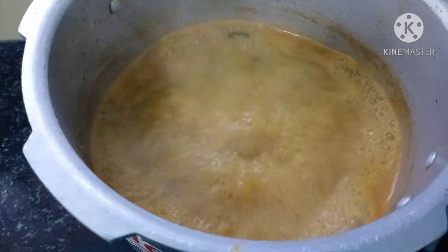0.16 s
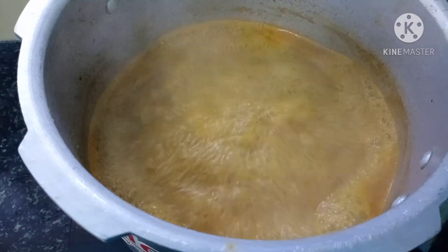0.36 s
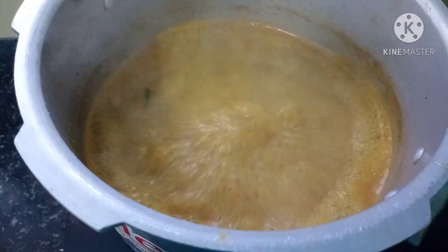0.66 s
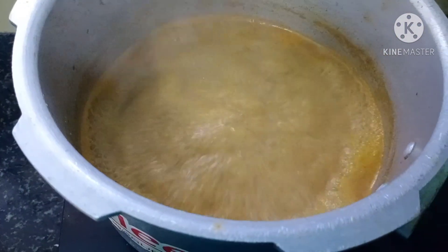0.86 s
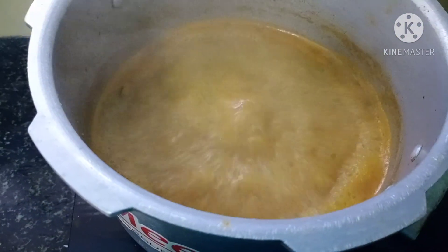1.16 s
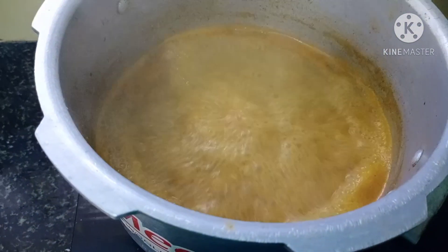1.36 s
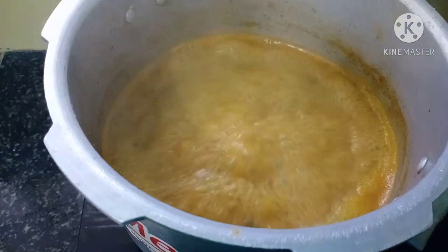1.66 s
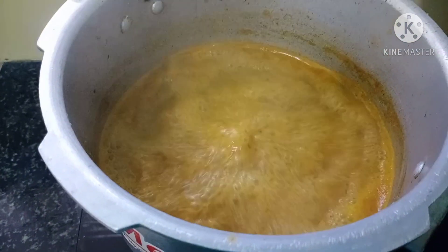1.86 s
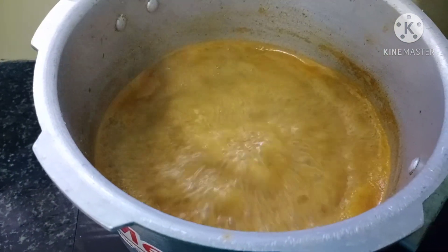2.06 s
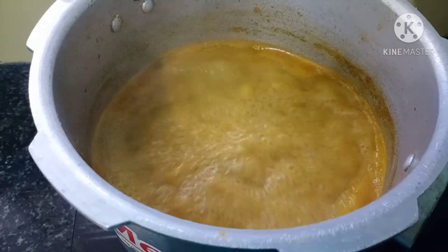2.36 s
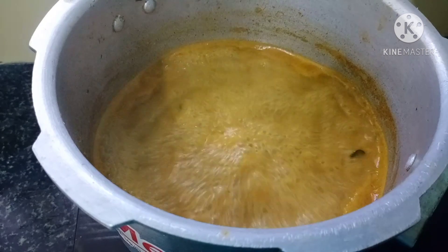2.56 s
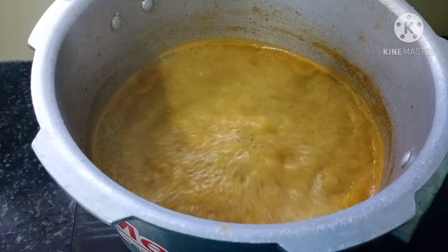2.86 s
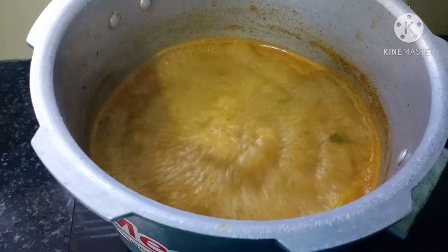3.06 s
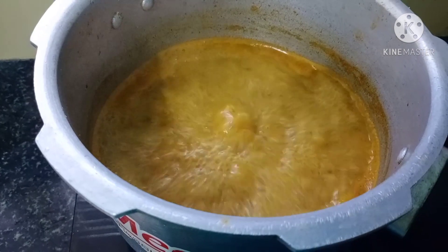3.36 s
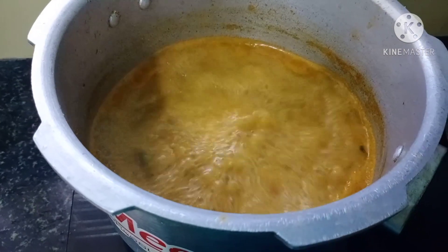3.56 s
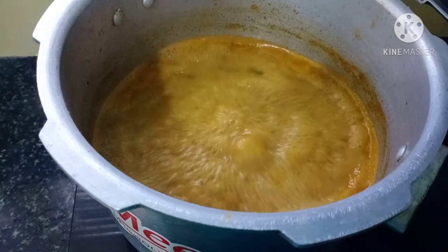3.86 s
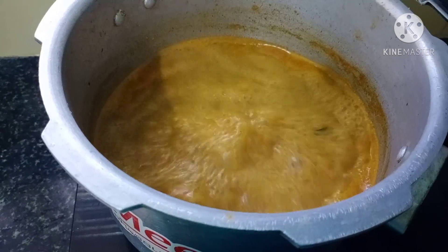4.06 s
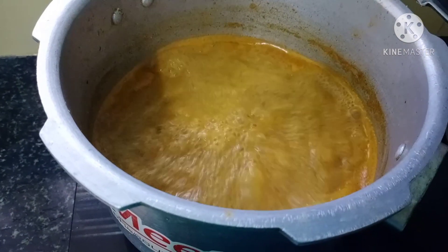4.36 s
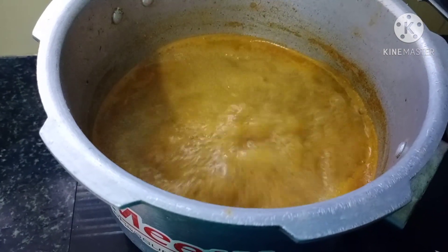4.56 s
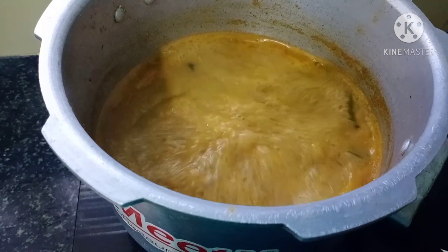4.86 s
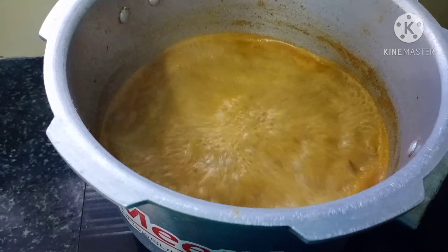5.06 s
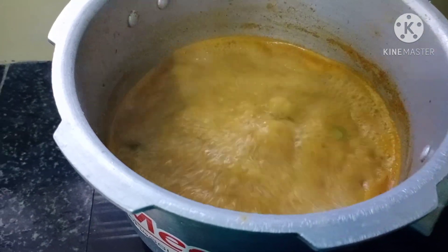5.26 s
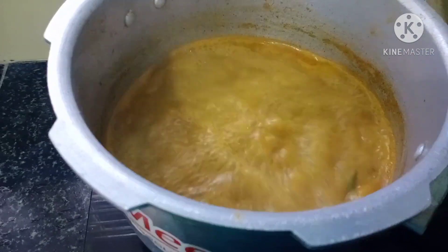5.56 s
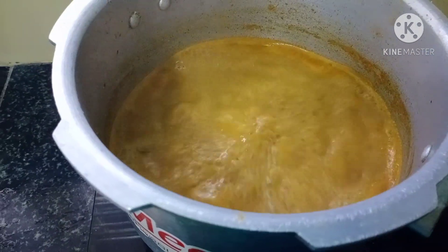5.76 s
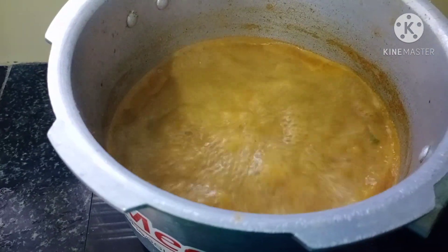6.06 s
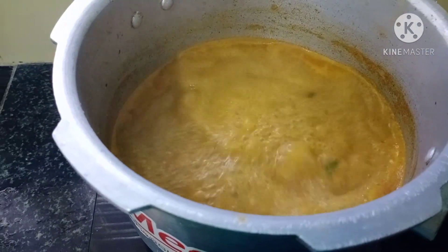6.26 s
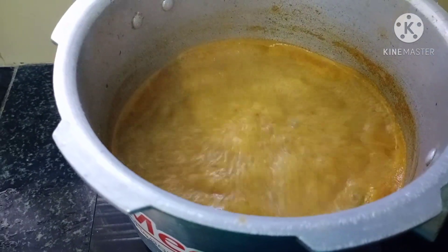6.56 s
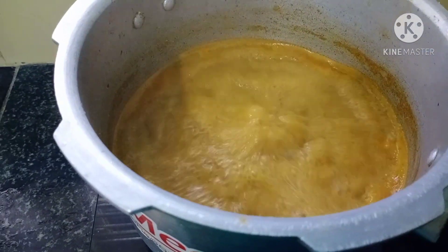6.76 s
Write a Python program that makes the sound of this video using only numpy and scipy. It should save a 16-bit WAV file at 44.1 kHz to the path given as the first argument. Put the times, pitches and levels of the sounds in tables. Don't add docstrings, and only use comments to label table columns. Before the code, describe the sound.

Close above a deep metal pot, thick curry boils hard without pause. Rapid bubble collapses ring the wall in a hollow, fluttering rattle that surges and eases, while big bubbles thump, glug and plop underneath. Fine fizz and tiny spits sit on top. A faint fan tone holds behind, and distant steel dishes ring softly near the end. A phone microphone in a home kitchen, dry and near.

```python
import sys
import numpy as np
from scipy import signal
from scipy.fft import rfft, irfft, next_fast_len
from scipy.io import wavfile
from scipy.ndimage import uniform_filter1d

SR = 44100
rng = np.random.default_rng(int(sys.argv[2]) if len(sys.argv) > 2 else 0)


def int16_out(signal):
    q = np.round(np.clip(np.atleast_2d(signal).T, -1, 1) * 32767)
    wavfile.write(sys.argv[1], SR, q.astype(np.int16))


def rack_gain(trim_db):
    fader = np.asarray(trim_db, float)
    return 10 ** (fader / 20)


N = 304092
LONG = next_fast_len(N)
HZ = np.maximum(np.arange(LONG // 2 + 1) * SR / LONG, 1)
SIMMER_DB, HEAVE_REST_DB = -41.5, -62.5

# centre_s [s], level_db [dB], length_s [s]
HEAVE_EVENTS = [(0.25, -55, 0.11), (0.64, -41, 0.064), (0.76, -46, 0.062), (1.12, -62, 0.05),
                (1.23, -60, 0.037), (1.57, -59, 0.057), (0.87, -46.5, 0.099), (1.18, -45, 0.073),
                (1.88, -62, 0.51), (1.97, -56, 0.066), (2.08, -43.5, 0.04), (2.19, -43.5, 0.042),
                (2.79, -53, 0.065), (2.9, -58, 0.2), (3.16, -50, 0.054), (3.49, -52, 0.071),
                (3.7, -45, 0.12), (5.64, -57.5, 0.5), (5.9, -65, 0.04), (5.99, -59, 0.049),
                (6.15, -59, 0.054), (6.4, -43.5, 0.099), (6.8, -49.5, 0.11)]


def in_time(rows):
    s, *columns = np.transpose(rows)
    return [np.interp(np.arange(N) / SR, s, c) for c in columns]


def at_hz(points, hz, axis=1):
    return np.interp(np.log(hz), np.log(np.array(points)[:, 0]), np.array(points)[:, axis])


def rms_one(x):
    return x / np.sqrt(np.mean(x ** 2) + 1e-20)


def within(x, low_hz, high_hz):
    sos = signal.butter(4, [low_hz, high_hz], "band", fs=SR, output="sos")
    band = signal.sosfilt(sos, x)
    return x / np.sqrt(np.mean(band ** 2))


def drift(rate_hz):
    r = np.exp(-80 * np.pi * rate_hz / SR)
    noise = rng.standard_normal(N // 40 + 2002)
    slow = signal.lfilter([1], [1, -2 * r, r * r], noise)[2000:]
    return np.interp(np.arange(N) / 40, np.arange(len(slow)), rms_one(slow))


def wobble(hz, stray_hz, rate_hz):
    phase = 2 * np.pi * np.cumsum(hz + stray_hz * drift(rate_hz)) / SR
    return np.sqrt(2) * np.sin(phase)


def grains(per_s, spread_db):
    sizes = rack_gain(spread_db * np.minimum(rng.exponential(1, N), 4.2))
    signs = rng.choice([-1, 1], N)
    return rms_one(sizes * signs * (rng.random(N) < per_s / SR))


def peak(x, hz, width_hz):
    r = np.exp(-np.pi * width_hz / SR)
    section = [(1 - r * r) / 2, 0, (r * r - 1) / 2, 1, -2 * r * np.cos(2 * np.pi * hz / SR), r * r]
    return signal.sosfilt([section, section], x + 1e-18)


def body(drive, modes, even_s):
    out = np.zeros(N)
    for k, (hz, width_hz, db) in enumerate(modes):
        out += (-1) ** k * rack_gain(db) * peak(drive, hz, width_hz)
    power = uniform_filter1d(out ** 2, size=int(even_s * SR))
    return rms_one(out / np.sqrt(power + 1e-12))


def coloured(drive, spectrum, patch_hz, patch_s, patchy_db):
    inside = (HZ > spectrum[0][0]) & (HZ < spectrum[-1][0])
    shaped = irfft(rfft(drive, LONG) * rack_gain(at_hz(spectrum, HZ)) * inside, LONG)
    cells = signal.stft(shaped, nperseg=1024)[2]
    field = rng.standard_normal(cells.shape)
    for axis, size in enumerate([patch_hz * 1024 / SR, patch_s * SR / 512]):
        for twice in range(2):
            field = uniform_filter1d(field, size=int(size) + 1, axis=axis)
    gain = rack_gain(patchy_db * np.minimum(rms_one(field), .4))
    return signal.istft(cells * gain, nperseg=1024)[1][:N]


def blips(events, rise_s, trim_db, order=2):
    out, t = np.zeros(N + SR), np.arange(int(6 * rise_s * SR)) / SR
    shape = ((t / rise_s) * np.exp(1 - t / rise_s)) ** order
    for s, db, hz in events:
        i = max(int((s - 0.403 * rise_s) * SR), 0)
        out[i:i + len(t)] += rack_gain(db + trim_db) * shape * np.sin(2 * np.pi * hz * t)
    return out[:N]


def swells(events, rest_db, restless_db, rate_hz):
    t = np.arange(0, N + 100, 100) / SR
    bells = sum(rack_gain(db) * np.exp(-(2 * (t - s) / length_s) ** 2) for s, db, length_s in events)
    rest = rack_gain(rest_db + restless_db * np.minimum(drift(rate_hz), .7))
    return 20 * np.log10(rest + np.interp(np.arange(N) / SR, t, bells))


def dips(events):
    t = np.arange(0, N + 100, 100) / SR
    bells = sum(db * np.exp(-(2 * (t - s) / length_s) ** 2) for s, db, length_s in events)
    return np.interp(np.arange(N) / SR, t, bells)


def lull(events, before_s, depth):
    marks = np.zeros(N)
    marks[[int(s * SR) for s, db, hz in events]] = 1
    size = int(before_s * SR)
    wide = uniform_filter1d(uniform_filter1d(marks, size=size), size=size)
    return 1 - np.clip(depth, 0, 1) * np.minimum(wide * before_s * SR * 1.35, 1)


def vigour():
    # centre_s [s], level_db [dB], length_s [s]
    surges = [(0.0, -38, 0.59), (0.46, -27.5, 0.26), (.12, -57, 0.17), (.85, -44, 0.21),
              (1.04, -36.5, 0.17), (1.68, -33, 0.28), (2.07, -31, 0.19), (2.53, -35, 0.28),
              (3.01, -34.5, 0.12), (3.16, -35, 0.13), (3.39, -26, 0.089), (3.56, -32.5, 0.23),
              (3.91, -55, 0.056), (4.12, -39.5, 0.65), (4.63, -39.5, 0.18), (5.13, -33.5, 0.37),
              (5.95, -39, 1), (6.26, -29, 0.2), (6.59, -44, 1), (6.81, -33, 0.13)]
    return swells(surges, SIMMER_DB, restless_db=6.0, rate_hz=0.54) - SIMMER_DB


def fan():
    # time_s [s], line_hz [Hz, 26th multiple of the turning rate], level_db [dB rms]
    line = [
        (0, 517.2, -54.5),
        (1, 517.6, -50),
        (2, 519, -55),
        (3.5, 519.8, -53.5),
        (5.4, 520.6, -56),
        (5.53, 520.4, -61),
        (5.66, 520.2, -54),
        (5.9, 520, -58.5),
        (6.4, 518.6, -53.5),
        (6.9, 518.6, -64),
    ]
    # order [multiple of the turning rate], level_db [dB rms]
    orders = [(5, -64.5), (6, -66.5), (7, -68), (15, -91), (16, -83), (20, -58.5), (21, -64), (22, -69),
              (23, -75), (27, -69), (28, -69.5), (29, -74), (43, -76), (48, -70.5)]
    line_hz, line_db = in_time(line)
    turn = 2 * np.pi * np.cumsum(line_hz / 26) / SR
    out = rack_gain(line_db) * np.sin(26 * turn)
    for order, db in orders:
        level = rack_gain(db + 4.9 * drift(5.7))
        out += level * np.sin(round(order) * turn + 1.26 * drift(0.87))
    return np.sqrt(2) * out


def dishes():
    # [dB, relative]
    rings = [
        (6.14, 0.2, 4370, -69),
        (6.32, 0.1, 2680, -61.5),
        (6.38, 0.15, 3300, -66),
        (6.6, 0.082, 2503, -61),
        (6.6, 0.21, 3480, -65),
        (6.73, 0.083, 3000, -63),
        (6.74, .13, 3430, -66),
    ]
    out = np.zeros(N)
    for s, length_s, hz, db in rings:
        i = int(s * SR)
        t = np.arange(min(int(length_s * SR), N - i)) / SR
        swell = np.sqrt(np.sin(np.pi * t / length_s))
        out[i:][:len(t)] += rack_gain(db + 10) * swell * np.sin(2 * np.pi * hz * t)
    return out


def surface():
    # time_s [s], level_db [dB over its calmest level]
    froth = [
        (0, 1),
        (1.0, 0.24),
        (3.5, 0.1),
        (4.8, 0),
        (5.7, 0),
        (6.05, 2.5),
        (6.5, 3),
        (6.9, 2.5),
    ]
    # centre_s [s], level_db [dB], length_s [s]
    puffs = [
        (1.4, -76, 0.63),
        (2.8, -78, 0.65),
        (5.33, -70, 0.33),
        (5.85, -67, 0.28),
        (6.7, -63, .45),
    ]
    # centre_s [s], depth_db [dB], length_s [s]
    veils = [
        (4.75, -4, .12),
        (4.95, 0, .1),
        (5.87, -5, 0.21),
        (6.2, -4.5, 0.36),
    ]
    # start_s [s], peak_db [dB], pitch_hz [Hz]
    droplets = [(0.0687, -41, 6610), (0.7851, -41, 6820), (0.9248, -45, 7140), (1.172, -39, 6670),
                (2.2344, -37, 6700), (2.6569, -53, 6520), (3.042, -39, 6650), (3.275, -39, 6420),
                (3.4241, -41, 7050), (3.5934, -38, 6700), (4.405, -40, 6100), (4.5206, -44, 7200),
                (5.3872, -33, 15200), (5.5937, -40, 15200), (5.6725, -42, 7000), (5.7443, -41, 7040),
                (5.7825, -39, 7150), (5.9878, -42, 7040), (6.2148, -40, 6800), (6.362, -38, 7300),
                (6.4383, -46, 6850), (6.4944, -30, 6750), (6.5475, -39, 7300), (6.6263, -44, 7140),
                (6.7261, -37, 6970), (6.8239, -38, 7000)]
    # freq_hz [Hz], density_db [dB per Hz]
    churn_spectrum = [(860, -16), (1000, 4), (1500, 0.5), (1900, -5.5), (2300, -8.5), (2800, -7),
                      (3500, -11), (4300, -9), (4700, -14), (5100, -16.5), (6000, -29.5)]
    fizz_spectrum = [(4500, -49), (5500, -2.5), (6800, 5), (7500, -1), (8500, -12.5), (10000, -28)]
    spray_spectrum = [(7000, -5.5), (8500, -1.5), (10000, 2.5), (11300, -0.5), (12500, -14)]
    mist_spectrum = [(10500, -30), (12000, -3.5), (13500, 0.5), (15300, 7), (17000, -9)]

    froth_db, = in_time(froth)
    churn_db = -52.5 + froth_db + 0.17 * vigour()
    fizz_db = -56.5 + 1.45 * froth_db
    mist_db = swells(puffs, -58.5, restless_db=.6, rate_hz=6.3)
    spray_db = .5 * (fizz_db + mist_db) - 7.0 + dips(veils)

    white = rng.standard_normal(N)
    bursts = rack_gain(4.3 * np.minimum(drift(36.0), 1.6)) * grains(900, spread_db=3.5)
    specks = rack_gain(2.5 * drift(24)) * grains(950, spread_db=4.0)

    churn = coloured(white + 0.18 * bursts, churn_spectrum, patch_hz=60, patch_s=.05, patchy_db=6.0)
    fizz = coloured(white + 0.44 * bursts, fizz_spectrum, patch_hz=150, patch_s=.04, patchy_db=2.5)
    spray_drive = rack_gain(1.2 * drift(22)) * white + 0.96 * bursts
    spray = coloured(spray_drive, spray_spectrum, patch_hz=400, patch_s=.03, patchy_db=2.0)
    mist_drive = white + 0.25 * bursts + 1.0 * specks
    mist = coloured(mist_drive, mist_spectrum, patch_hz=600, patch_s=.015, patchy_db=-0.5)

    out = rack_gain(churn_db) * within(churn, 1630, 5900) + rack_gain(fizz_db) * within(fizz, 4200, 10600)
    out += rack_gain(spray_db) * rms_one(spray) + rack_gain(mist_db) * within(mist, 12700, 15800)
    return out + blips(droplets, rise_s=0.00036, trim_db=3.5)


def gurgle():
    # centre_s [s], level_db [dB], length_s [s]
    glug_runs = [(0.45, -58.5, 0.33), (1.06, -60, 0.05), (1.79, -56.5, 0.16), (2.49, -55.5, 0.18),
                 (3.45, -50, 0.13), (3.59, -45, 0.039), (3.79, -51.5, 0.11), (5.24, -53, 0.083),
                 (5.54, -50.5, 0.046), (5.87, -50.5, 0.089), (6.06, -55, 0.14), (6.24, -56, 0.073),
                 (6.58, -57.5, 0.32)]
    # centre_s [s], depth_db [dB], length_s [s]
    pauses = [(0.748, -10, 0.13), (1.0, -5, 0.24), (1.6, -7.5, 0.42), (2.32, -13, 0.12), (2.5, -6, .1),
              (2.9, 1, 0.22), (3.3, -6, .1), (3.87, -7, 0.16), (4.15, -8, 0.055), (4.5, 0, .1),
              (4.77, -7, 0.11), (4.97, -5, .2), (5.25, 0, .1), (5.5, -7, 0.36), (5.9, -7, 0.46),
              (6.15, -8, .1), (6.65, -1.5, 0.35)]
    # centre_s [s], level_db [dB], length_s [s]
    rolls = [
        (1.12, -51, 0.078),
        (3.15, -57, 0.7),
    ]
    # pitch_hz [Hz], width_hz [Hz], level_db [dB]
    glug_modes = [(305, 29.6, 0.16), (326.3, 11, 0), (347.3, 16.6, 1)]
    drone_modes = [(442, 145, -2), (472.7, 30, 6.5), (502, 57, -9), (529, 51, 0.5), (571.5, 43, -1.5)]
    # freq_hz [Hz], density_db [dB per Hz]
    plop_spectrum = [(540, 9), (600, 1.5), (700, -2), (800, 0), (950, -1), (1050, -48)]
    rumble_spectrum = [(20, 3), (35, -11), (50, -5), (80, 2), (120, 2.5), (170, 1.5), (200, -7.5),
                       (250, -12), (300, -18)]

    glug_db = swells(glug_runs, -67 + 0.41 * vigour(), restless_db=7.0, rate_hz=7.7)
    plop_db = -62 + 0.14 * vigour() + 3.2 * np.minimum(drift(12.0), .7) + dips(pauses)
    heave_db = swells(HEAVE_EVENTS, HEAVE_REST_DB, restless_db=9.0, rate_hz=7.0)
    rumble_rest_db = -61.5 + 0.17 * (heave_db - HEAVE_REST_DB)
    rumble_db = swells(rolls, rumble_rest_db, restless_db=2.5, rate_hz=4.2)

    glug = body(grains(300, spread_db=2.0), glug_modes, even_s=0.25)
    plops = coloured(grains(900, spread_db=-1.0), plop_spectrum, patch_hz=70.0, patch_s=.06, patchy_db=8.0)
    rumble = coloured(grains(150, spread_db=1.5), rumble_spectrum, patch_hz=60, patch_s=.06, patchy_db=9.0)
    drone = body(rng.standard_normal(N), drone_modes, even_s=0.1)

    out = rack_gain(glug_db - 0.5) * within(glug, 270, 480) + rack_gain(plop_db + 1.5) * within(plops, 605, 1210)
    return out + rack_gain(rumble_db - 2.0) * within(rumble, 110, 230) + rack_gain(-57.5) * drone


def bulk():
    # centre_s [s], level_db [dB], length_s [s]
    sloshes = [(0.12, -55, 0.15), (0.74, -63.0, 0.19), (1.85, -53.5, 0.24), (3.8, -54, 0.61),
               (3.93, -69, 0.052), (4.13, -61, 0.33), (4.53, -49, 0.17), (4.88, -53, 0.23),
               (5.6, -50, 0.27), (5.9, -52.5, 0.13), (6.48, -54, 0.15), (6.65, -57, 0.15),
               (6.81, -56, 0.08)]
    # pitch_hz [Hz], width_hz [Hz], level_db [dB]
    thump_modes = [(109.3, 24, -1), (166.5, 7.3, 0), (142.2, 7.4, -13.5)]
    thump_db = swells(HEAVE_EVENTS, HEAVE_REST_DB, restless_db=4.0, rate_hz=6.2)
    slosh_db = swells(sloshes, -77.5, restless_db=9.0, rate_hz=5.3)
    thump = 1.19 * wobble(97.6, stray_hz=4.14, rate_hz=4.26)
    thump += 0.5 * body(grains(200, spread_db=1.5), thump_modes, even_s=0.2)
    slosh = wobble(65.5, stray_hz=3.4, rate_hz=7.75)
    return rack_gain(thump_db + 1.54) * thump + rack_gain(slosh_db + 2.0) * slosh


def pot():
    # crest_s [s], peak_db [dB], pitch_hz [Hz]
    strong_knocks = [(0.0158, -26.5, 1193), (0.3105, -25.0, 1177), (0.342, -23.0, 1151), (0.3758, -25, 1172),
                     (0.3945, -23.5, 1145), (0.4461, -27, 1205), (0.4718, -21, 1177), (0.4856, -19.5, 1160),
                     (0.5426, -26.5, 1134), (0.558, -24.5, 1236), (0.5732, -24.5, 1103),
                     (1.017, -26.5, 1174), (1.0411, -25.5, 1220), (1.055, -24.5, 1113), (1.487, -28.5, 1135),
                     (1.523, -25.5, 1123), (1.5659, -24, 1143), (1.596, -25, 1237), (1.6035, -21, 1168),
                     (1.624, -23.5, 1130), (1.6502, -25, 1172), (1.6626, -23.5, 1140), (1.7223, -23.5, 1155),
                     (1.7655, -24.0, 1170), (1.8127, -24.5, 1138), (1.875, -26, 1212), (1.9397, -25, 1180),
                     (1.973, -28, 1156), (2.0348, -29, 1158), (2.0608, -23, 1134), (2.0723, -25.5, 1157),
                     (2.0986, -22.5, 1155), (2.1199, -22, 1152), (2.3704, -27, 1174), (2.4178, -26, 1210),
                     (2.4677, -26.5, 1187), (2.4875, -25, 1145), (2.52, -26.5, 1190), (2.5566, -24, 1186),
                     (2.5984, -24.5, 1189), (2.6204, -25, 1217), (2.657, -28.5, 1150), (2.9767, -26.5, 1226),
                     (3.0171, -24.0, 1130), (3.164, -23.5, 1190), (3.3517, -22.5, 1180),
                     (3.3868, -18.5, 1180), (3.4011, -23, 1180), (3.424, -21.5, 1180), (3.4345, -25, 1210),
                     (3.4463, -23, 1150), (3.4655, -22, 1123), (3.483, -25, 1220), (3.513, -23.5, 1170),
                     (3.5335, -24.5, 1200), (3.5932, -19.0, 1183), (3.6177, -22, 1160), (3.6453, -28, 1166),
                     (3.683, -24, 1190), (3.7135, -28, 1150),
                     (3.8038, -23.5, 1159), (3.894, -22.5, 1169), (3.9236, -24, 1201), (3.9856, -25.5, 1180),
                   (4.0121, -25.5, 1169), (4.0447, -22.5, 1169), (4.1034, -24.5, 1171),
                   (4.1637, -25.5, 1182), (4.3215, -26, 1153), (4.3453, -26, 1162), (4.3717, -24.5, 1171),
                   (4.5517, -26, 1158), (4.6122, -22, 1199), (4.6636, -28.5, 1187), (4.7036, -24, 1175),
                   (4.9013, -24, 1166), (4.9935, -26, 1213), (5.022, -27.5, 1159), (5.0616, -27.0, 1143),
                   (5.0832, -24.0, 1157), (5.1111, -25.5, 1153), (5.146, -26, 1146), (5.1699, -26, 1168),
                   (5.271, -27, 1169), (5.3226, -27, 1170), (5.4611, -27.0, 1177), (5.5195, -26.5, 1169),
                   (5.5813, -28.5, 1202), (5.6441, -26.5, 1174), (5.7965, -29, 1184), (5.8895, -25.0, 1147),
                   (5.9285, -28, 1160), (5.9412, -26, 1182), (5.9711, -25.5, 1158), (6.0089, -23.0, 1195),
                   (6.0386, -29, 1180), (6.108, -25.0, 1164), (6.1176, -26.5, 1171), (6.1414, -26.5, 1162),
                   (6.1617, -24.0, 1137), (6.1986, -19.5, 1194), (6.2282, -22.5, 1176), (6.2553, -18, 1162),
                   (6.2763, -18.5, 1157), (6.301, -18.5, 1166), (6.318, -24, 1158), (6.3484, -26, 1142),
                   (6.3829, -25, 1162), (6.441, -29, 1164), (6.5013, -25, 1189), (6.5292, -26, 1176),
                   (6.634, -27.5, 1168), (6.685, -25.5, 1130), (6.7453, -28, 1155), (6.7708, -25.0, 1209),
                   (6.7884, -26, 1172), (6.7992, -20.5, 1171), (6.8179, -27, 1179), (6.8594, -25.0, 1176),
                   (6.8897, -25.5, 1171)]
    # centre_s [s], level_db [dB], length_s [s]
    air_bursts = [(0.09, -49, 0.07), (0.25, -46, 0.028), (0.49, -51.5, 0.11), (0.62, -48, 0.086),
                  (0.85, -47, 0.098), (1.14, -52, 0.11), (1.6, -47, 0.098), (1.8, -47.5, .06),
                  (2.06, -42.5, 0.086), (2.15, -40, 0.06), (2.42, -48, .08), (2.97, -54.5, 0.078),
                  (3.15, -46, 0.031), (3.24, -43, 0.032), (3.84, -54, 0.081), (4.03, -45, 0.05),
                  (4.16, -48.5, 0.1), (4.4, -48, 0.27), (4.69, -59, 0.19), (5.35, -48, 0.054),
                  (5.78, -52, 0.54), (6.08, -49, 0.042), (6.24, -44.5, 0.075), (6.39, -51, 0.056),
                  (6.58, -45, 0.085), (6.76, -52.5, 0.3)]
    # centre_s [s], depth_db [dB], length_s [s]
    chokes = [(.2, -6, .05), (.73, -19, 0.12), (.96, -15, 0.09), (1.25, -19, 0.085), (1.46, -17, 0.08),
              (1.88, -7.5, 0.21), (2.26, -8, 0.056), (2.5, -15, 0.091), (2.63, -8, 0.096), (2.9, 4, .05),
              (3.31, -1, 0.066), (3.7, -18, 0.07), (4.07, -10, .05), (4.26, -9, .05), (4.53, -13, 0.066),
              (4.8, -3, .06), (5.15, -4, 0.16), (5.45, -11, 0.055), (5.64, -6, .06), (6.46, -8, 0.076)]
    # start_s [s], peak_db [dB], pitch_hz [Hz]
    bloops = [
        (2.62, -53, 480),
        (4.16, -51, 600),
        (4.22, -49, 558),
        (5.28, -45, 455),
        (5.36, -47, 478),
        (6.26, -59, 617),
        (6.55, -44, 451),
        (.45, -53, 615),
    ]
    # pitch_hz [Hz], width_hz [Hz], level_db [dB]
    wall_modes = [(1032, 20, -19.5), (1067, 21, -9.5), (1092, 33.6, -6), (1130.3, 35.4, -1),
                  (1136.4, 38.6, -5), (1161.7, 27.2, 2), (1166, 25.2, 1.5), (1188.4, 34, -0.5),
                  (1199.1, 35, -3), (1239.2, 36, -11), (1252.4, 23.3, -9), (1260, 3.8, -5),
                  (1308, 47, -18.5), (1308, 14, -28), (1464, 35, -20)]
    air_modes = [(393.9, 12.4, 1.5), (372.7, 21.5, -5)]

    knocks = strong_knocks
    wall_db = SIMMER_DB + 0.92 * vigour()
    air_db = swells(air_bursts, -49.5, restless_db=-1.4, rate_hz=2.8) + dips(chokes)

    turn = 2 * np.pi * np.cumsum(33.4 + .2 * drift(1)) / SR
    trembling = rack_gain(1.6 * np.cos(turn) + 1.2 * np.cos(2 * turn) + 2.2 * np.cos(3 * turn))
    wall = body(trembling * rng.standard_normal(N), wall_modes, even_s=0.089)
    wall = rack_gain(wall_db - .6) * wall * lull(knocks, before_s=.015, depth=.8)
    knock_starts = [(s - .005, db, hz) for s, db, hz in knocks]
    wall = wall + blips(knock_starts, rise_s=0.00685, trim_db=0.34, order=3)
    wall = signal.sosfilt(signal.butter(8, 960, "high", fs=SR, output="sos"), wall)

    air = 0.77 * wobble(399, stray_hz=3.177, rate_hz=3.855)
    air += 0.6 * body(rng.standard_normal(N), air_modes, even_s=0.098)
    return wall + rack_gain(air_db + 1.2) * air + blips(bloops, rise_s=0.03, trim_db=0.0)


def scene():
    mono = fan() + dishes() + surface() + gurgle() + bulk() + pot()
    return np.tile(mono, (2, 1))


def ports(x):
    # freq_hz [Hz], left_minus_right_db [dB], likeness [0-1]
    port_curve = [(60, -1.2, .9), (200, -.8, .88), (320, 3.5, .99), (800, 4.5, .97), (1170, 8, 1),
                  (1800, 5, 1), (5500, 3.3, .99), (5800, 0, 1), (6800, -.5, .99), (8000, -9, .7),
                  (8700, -20, .3), (9150, -90, .1), (9700, -25, .4), (10700, -18, .4), (11300, -36, .2),
                  (11900, -11, .5), (15400, -4.5, .83)]
    ratio = rack_gain(at_hz(port_curve, HZ))
    alike = np.clip(at_hz(port_curve, HZ, axis=2), 0, 1)
    direct, scattered = rfft(x, LONG), rfft(np.roll(x, SR // 3), LONG)
    norm = 2 / np.sqrt(1 + ratio ** 2 + 2 * ratio * alike)
    left = norm * ratio * (alike * direct + np.sqrt(1 - alike ** 2) * scattered)
    right = norm * direct
    deaf = (HZ > 8300) & (HZ < 12600)
    deaf_band = [(8300, -3), (12600, -3)]
    flicker = coloured(irfft(left, LONG), deaf_band, patch_hz=500, patch_s=.03, patchy_db=17.0)
    return np.array([irfft(left * ~deaf, LONG)[:N] + flicker, irfft(right, LONG)[:N]])


def top_cut(x):
    return signal.sosfilt(signal.butter(12, 15850, fs=SR, output="sos"), x)


def record(dry):
    held = .19 * np.tanh(dry[0] / .19)
    steep = signal.ellip(10, .5, 30, 15470, fs=SR, output="sos")
    mix = signal.sosfilt(steep, ports(held))
    return top_cut(mix)


dry = scene()
out = record(dry)
int16_out(out)
```